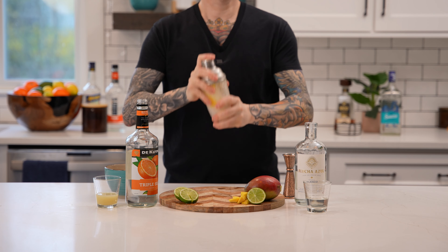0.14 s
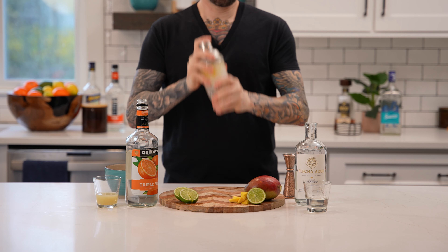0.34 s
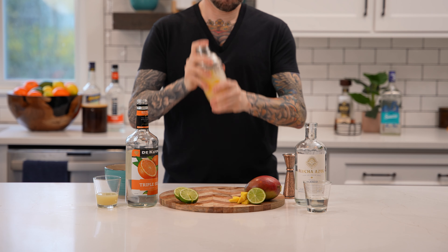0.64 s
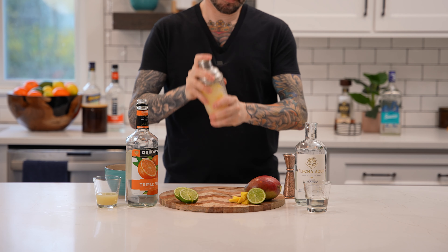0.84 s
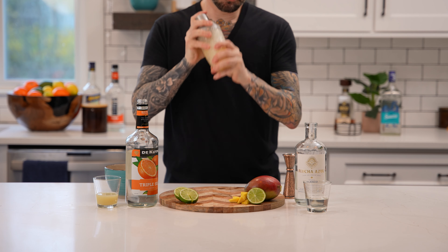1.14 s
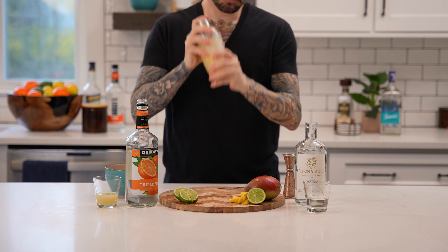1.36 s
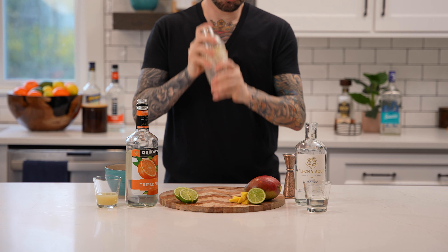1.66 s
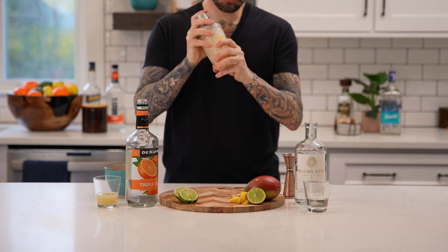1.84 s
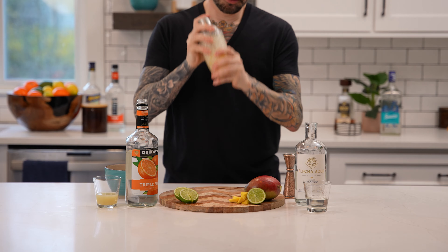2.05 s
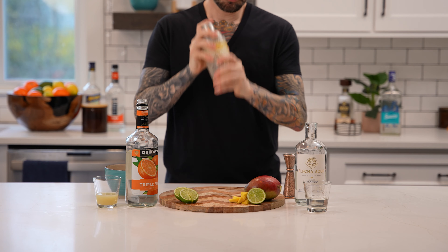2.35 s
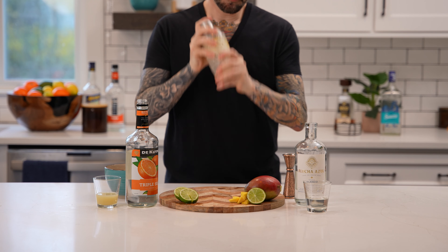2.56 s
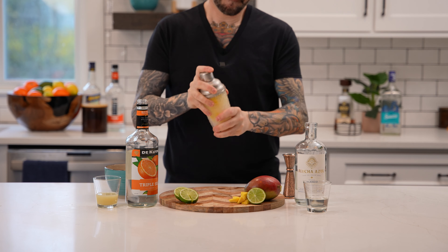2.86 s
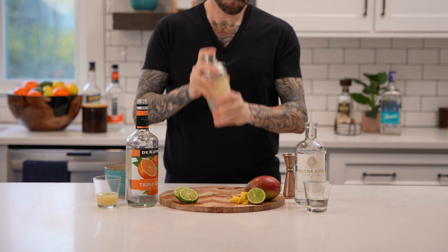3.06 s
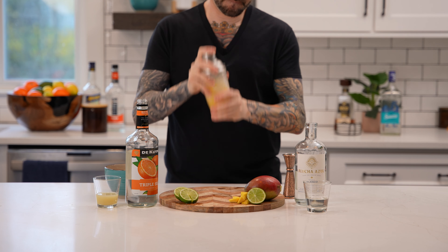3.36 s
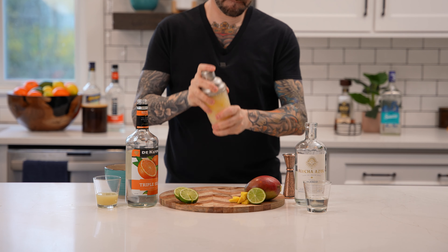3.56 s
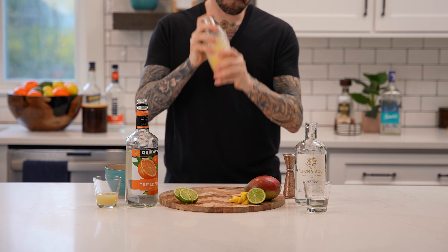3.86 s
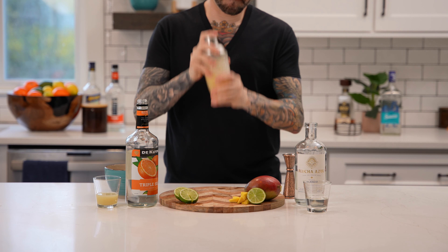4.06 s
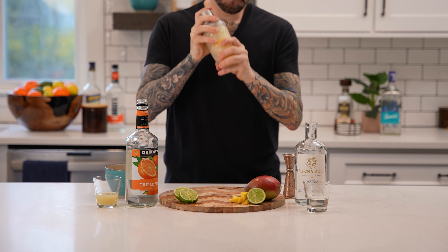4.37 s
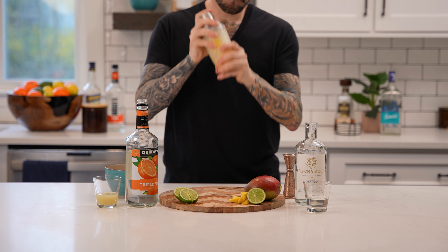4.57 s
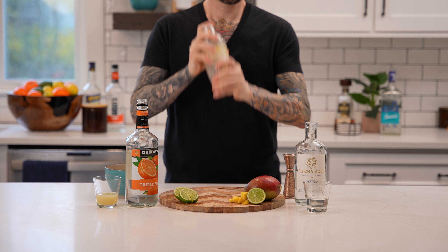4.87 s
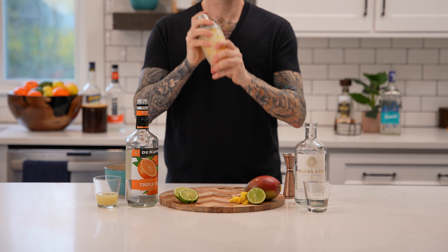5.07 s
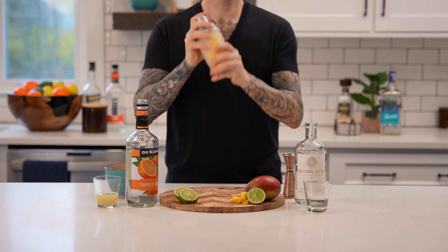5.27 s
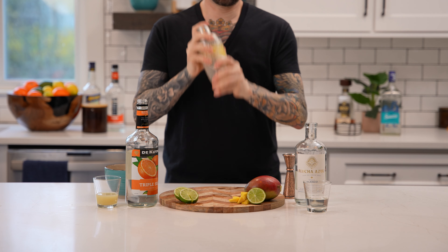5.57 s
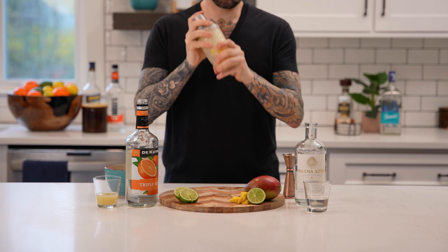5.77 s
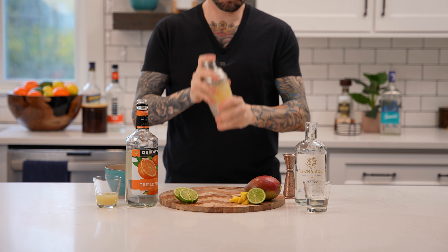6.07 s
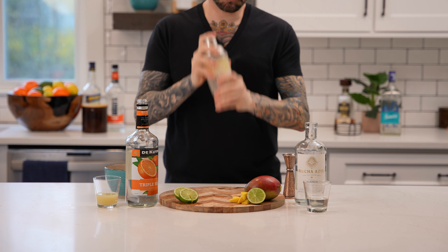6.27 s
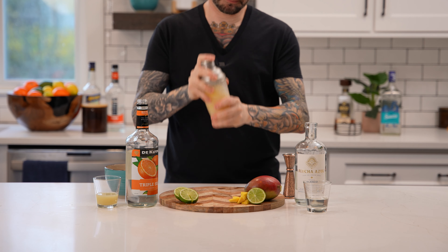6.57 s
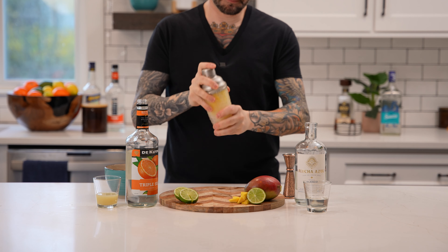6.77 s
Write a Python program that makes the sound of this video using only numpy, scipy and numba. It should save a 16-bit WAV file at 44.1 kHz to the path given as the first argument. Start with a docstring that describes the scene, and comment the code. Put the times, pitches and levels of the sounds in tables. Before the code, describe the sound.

Ice and juice are shaken hard in a hand-held cocktail shaker. Cubes knock sharply and small chips rattle against each end in turn, nearly nine hits a second, with a wet hiss and hollow sloshing underneath. The rhythm runs from start to finish without a pause. The microphone is close, in a kitchen with very little echo and a faint low rumble.

```python
"""Kitchen, one close microphone: ice and juice shaken hard in a hand-held shaker, over a low house rumble.
The load lands at once: ice chips rattle on the damped wall, fine spray hisses along it, the juice
thuds, trapped air glugs and whole cubes knock. It then lands at cap and base in turn, nearly nine
times a second for seven seconds, each landing trailed by a short reflection of the room."""
import sys
import numpy as np
from scipy import signal
from scipy.fft import rfft, irfft
from scipy.io import wavfile
from scipy.ndimage import uniform_filter1d
from numba import njit

SR = 44100
rng = np.random.default_rng(int(sys.argv[2]) if len(sys.argv) > 2 else 0)


def output_pcm(signal):
    """Save a mono or channel-first signal as 16-bit PCM at the path in sys.argv[1].

    Samples are clipped to [-1, 1] before scaling.
    """
    pcm = np.clip(np.atleast_2d(signal).T, -1, 1) * 32767
    wavfile.write(sys.argv[1], SR, np.round(pcm).astype(np.int16))


N = 304856


def undb(db):
    return 10 ** (np.asarray(db) / 20)


def coloured_noise(spectrum):
    """Noise of rms 1 with the given spectrum."""
    hz, db = np.transpose(spectrum)
    bins_hz = np.maximum(np.arange(N // 2 + 1) * SR / N, 1)
    gain = undb(np.interp(np.log(bins_hz), np.log(hz), db, left=-40))
    noise = irfft(rfft(rng.standard_normal(N)) * gain, N)
    return noise / noise.std()


# Room tone, as a relative spectrum: frequency_hz, density_db
RUMBLE_SPECTRUM = [(20, 6), (55, 19), (110, -5), (250, -19), (12000, -60)]

def house_rumble(level_db=-53):
    """The house rumbles low and steady behind the shaker."""
    return coloured_noise(RUMBLE_SPECTRUM) * undb(level_db)


# Landings of the load, base and cap in turn; levels are relative:
# time_s, ice_db, tick_and_spray_db, juice_db, pocket_hz
LANDINGS = [(0.054, -26.5, -37.5, -33, 830), (0.182, -28, -38.5, -34, 625), (0.299, -27, -38.0, -39, 650),
            (0.411, -28.0, -36.5, -34, 630.0), (0.527, -26.5, -34.5, -32.0, 710),
            (0.639, -26.0, -34.5, -39, 497), (0.739, -26.0, -36, -29.5, 720),
            (0.849, -24, -33.5, -33.0, 553), (0.952, -25.5, -34.5, -34.0, 750),
            (1.061, -28.5, -34.5, -33, 530.0), (1.179, -26.5, -37.5, -28, 800),
            (1.295, -25, -30.5, -32.5, 730.0), (1.41, -27, -37, -29, 670),
            (1.522, -23.5, -32.5, -31, 600.0), (1.638, -26.5, -34, -34, 680),
            (1.748, -26, -33.0, -38, 510.0), (1.858, -25.5, -32.5, -35, 600), (1.979, -23, -35.0, -36, 570),
            (2.102, -27.5, -39.5, -33.5, 650.0), (2.218, -28.5, -32.5, -36, 600.0),
            (2.326, -24, -34.5, -29.5, 730.0), (2.442, -27, -33.5, -27, 613), (2.554, -24.5, -35, -29, 890),
            (2.665, -25.0, -35, -31.5, 716), (2.77, -27, -36, -25, 740), (2.885, -23.5, -30, -36, 730),
            (3.001, -25.5, -35, -33, 590), (3.112, -26, -32.0, -29.5, 590.0),
            (3.23, -30, -38.5, -30.5, 726), (3.345, -45, -46, -30.5, 570.0),
            (3.459, -29.5, -41.5, -28, 760), (3.577, -27, -35, -32.5, 757),
            (3.687, -27.5, -35.5, -37, 730.0), (3.8, -28, -32.5, -31.5, 650), (3.912, -27, -37.5, -29, 670),
            (4.02, -23.5, -31.5, -29.0, 614), (4.139, -27, -37.0, -28.5, 714),
            (4.256, -27.5, -36, -30.0, 615), (4.374, -27.5, -35.5, -28, 690.0),
            (4.485, -24, -33, -29.5, 620), (4.601, -27, -40.0, -33, 815), (4.721, -25.5, -33.5, -32, 670.0),
            (4.837, -23.5, -34.5, -27.5, 720), (4.952, -24, -30, -40, 615),
            (5.069, -24.5, -35.5, -31.5, 527), (5.183, -31, -32.5, -31, 610.0),
            (5.297, -28.5, -36.5, -29, 520.0), (5.416, -24.5, -31.5, -32.5, 720.0),
            (5.536, -28, -36, -31.5, 824), (5.649, -23.5, -32.5, -33.0, 740.0),
            (5.768, -27.5, -38.5, -33, 764), (5.89, -26.0, -34, -31.0, 520.0),
            (5.998, -28.5, -41, -34, 680.0), (6.111, -26.5, -30, -28, 630), (6.222, -26, -37.5, -32, 850.0),
            (6.335, -23.5, -31.5, -28.5, 620.0), (6.449, -27.0, -36, -32.5, 674),
            (6.562, -25, -30.5, -31.5, 645), (6.675, -26.5, -41.5, -27, 756), (6.796, -27.0, -35, -31, 630),
            (6.9, -29, -38, -31.0, 690.0)]
TIME, ICE, TICK_AND_SPRAY, JUICE, POCKET = range(5)

def landing_swell_db(t, column, shape, floor_db, steepness, delay_s=0.):
    """The level swells as the load reaches either end and sinks to a floor in between."""
    landings = np.array(LANDINGS)
    since_s = t[:, None] - landings[:, TIME] - delay_s
    build_s, fade_s = (np.resize(pair, len(landings)) for pair in shape)
    width_s = np.where(since_s < 0, build_s, fade_s)
    swells = np.exp(-np.abs(since_s / width_s) ** steepness)
    power = swells @ undb(2 * landings[:, column]) + undb(2 * floor_db)
    return 10 * np.log10(power)


@njit
def ring(start, hz, t60_s, amplitude, contact_s):
    """Every blow starts one decaying sine per mode; the contact time rounds its attack."""
    out = np.zeros(N)
    onset_decay = np.exp(-1 / (contact_s * SR))
    for blow in range(hz.shape[0]):
        for mode in range(hz.shape[1]):
            life = t60_s[blow, mode] * SR
            step = np.exp(2j * np.pi * hz[blow, mode] / SR - np.log(1000) / life)
            phasor, held_back = amplitude[blow, mode] + 0j, 1.
            for i in range(start[blow], min(N, start[blow] + int(life))):
                out[i] += phasor.imag * (1 - held_back) ** 2
                phasor *= step
                held_back *= onset_decay
    return out


# Modes of the shaker held in two hands, before each blow varies them: pitch_hz, level_db, t60_s
SHAKER_MODES = [(89, -6, 0.02), (577.5, -2.5, 0.016), (757.5, 0, 0.0097), (1156, 4.5, 0.0071),
                (1720, -11, 0.0056), (2364, -1, 0.0061), (3214, -3, 0.0032), (4870, -3, 0.0038),
                (6174, -4, 0.0043), (7470, -12, 0.0047), (9420, -12, 0.0046), (11000, -13, 0.004),
                (14000, -36, .002)]

def strike_shaker(start_s, bands_db, detune, scatter_db, damping_spread, contact_s, sustain):
    """Blows at other places and with other grips vary each mode's pitch, strength, sign and damping."""
    hz, mode_db, t60_s = np.transpose(SHAKER_MODES)
    band = np.digitize(hz, (1300, 3600, 8600))  # low, wall, tick and top bands
    draws = rng.standard_normal((len(start_s), 4, len(hz)))
    strength, sign, tuning, damping = draws.swapaxes(0, 1)
    level_db = np.transpose(bands_db)[:, band] + mode_db + scatter_db * strength
    pitch_hz = np.clip(hz * np.exp(detune * tuning), 50, .45 * SR)
    ring_s = sustain * t60_s * np.exp(damping_spread * damping)
    start = np.clip((start_s * SR).astype(np.int64), 0, N - 1)
    return ring(start, pitch_hz, ring_s, undb(level_db) * np.sign(sign), contact_s)


def size_boost_db(luck, spread_db, cap_db):
    """Most pieces hit lightly, a few much harder."""
    return np.minimum(-spread_db * np.log(luck + 1e-9), cap_db)


# Swells of the chips' clatter and of their ticks; rows build, fade: base_s, cap_s
CLATTER_SWELL = ((0.041, 0.049), (.035, 0.03))
TICK_SWELL = ((.035, 0.045), (.055, 0.032))

def ice_chips(count=2800, colour_db=8.0, brightening=0.63):
    """Small pieces of ice clatter on the wall; hard landings are brighter."""
    when, luck, colour = rng.random((count, 3)).T
    start_s = when * N / SR
    size_db = size_boost_db(luck, spread_db=6, cap_db=12)
    clatter_db = landing_swell_db(start_s, ICE, CLATTER_SWELL, floor_db=-43.5, steepness=2.8)
    swell_db = landing_swell_db(start_s, TICK_AND_SPRAY, TICK_SWELL, floor_db=-49.5, steepness=2.3)
    wall_db = clatter_db + size_db + 1.28
    tick_db = swell_db + size_db + 4 + colour_db * (2 * colour - 1)
    top_db = tick_db - 5.5 + brightening * (swell_db - swell_db.mean())
    return strike_shaker(start_s, [wall_db - 16.5, wall_db, tick_db, top_db], detune=0.078,
                         scatter_db=3.44, damping_spread=0.23, contact_s=.00004, sustain=1.22)


# Hiss of the spray, as a relative spectrum: frequency_hz, density_db
SPRAY_SPECTRUM = [(1500, 8.5), (5500, 3.5), (8000, -5), (11000, -12), (14000, -26), (16000, -29)]
# Swell of the spray; rows build, fade: base_s, cap_s
SPRAY_SWELL = ((.02, 0.031), (.04, 0.039))

def spray(flicker_db=6.5, flicker_s=0.0044):
    """Crushed ice and droplets wash along the wall at each landing, a flickering hiss."""
    coarse_t = np.arange(0, N, 64) / SR
    swell_db = landing_swell_db(coarse_t, TICK_AND_SPRAY, SPRAY_SWELL, floor_db=-45.5, steepness=4.6)
    wash_db = np.interp(np.arange(N) / SR, coarse_t, swell_db)
    hold = int(flicker_s * SR)
    steps = np.repeat(rng.standard_normal(N // hold + 1), hold)[:N]
    flicker = uniform_filter1d(steps, hold)
    return coloured_noise(SPRAY_SPECTRUM) * undb(wash_db - 2.5 + flicker_db * flicker)


# Swell of the juice; rows build, fade: base_s, cap_s
JUICE_SWELL = ((0.021, 0.016), (0.013, 0.021))

def juice_swell_db(t, floor_db):
    """The juice lands just behind the ice."""
    return landing_swell_db(t, JUICE, JUICE_SWELL, floor_db, steepness=3, delay_s=0.0043)


def slosh(count=2200):
    """Lumps of juice push the wall softly and for longer than ice, waking mainly the low modes."""
    when, luck = rng.random((count, 2)).T
    start_s = when * N / SR
    thud_db = juice_swell_db(start_s, floor_db=-55) + size_boost_db(luck, spread_db=3.6, cap_db=6.3) - 8
    return strike_shaker(start_s, [thud_db, thud_db - 21, thud_db - 40, thud_db - 50], detune=0.1254,
                         scatter_db=3.93, damping_spread=0.2, contact_s=0.00038, sustain=4.0)


def glugs(count=900, t60_s=0.031, detune=0.086):
    """The air pocket trapped by each slosh rings hollow at its own pitch."""
    when, luck = rng.random((count, 2)).T
    start_s = when * N / SR
    landings = np.array(LANDINGS)
    nearest = np.abs(start_s[:, None] - landings[:, TIME]).argmin(axis=1)
    pitch_hz = landings[nearest, POCKET] * np.exp(detune * rng.standard_normal(count))
    size_db = size_boost_db(luck, spread_db=3.3, cap_db=5.5)
    amplitude = undb(juice_swell_db(start_s, floor_db=-59) + size_db - 0.8)
    return ring((start_s * SR).astype(np.int64), pitch_hz[:, None], np.full((count, 1), t60_s),
                amplitude[:, None], contact_s=0.00042)


# The loudest knocks; levels are relative: start_s, wall_db, tick_db, low_db
LOUD_KNOCKS = [(0.058, -14, -31, -19.5), (0.0677, -15.0, -15.5, -35), (0.1353, -8.5, -19.0, -25),
               (0.1398, -23, -6.5, -21.5), (0.149, -29, -11, -31), (0.1647, -12, -17.0, -13.5),
               (0.1699, -4.5, -8.0, -24), (0.1781, -32, -10.5, -14.5), (0.1863, -8.0, -13, -24.0),
               (0.206, -19, -13, -26), (0.2852, -7.5, -13.5, -29), (0.3663, -5.5, -17.0, -27),
               (0.3965, -2.5, -8.5, -23), (0.5464, -22, -13, -28), (0.5638, -8.0, -6.5, -49),
               (0.5687, -9.5, -7, -38), (0.6191, -11.0, -19.0, -17), (0.6231, -9.5, -11, -15),
               (0.7335, -9, -18, -27), (0.7721, -31, -12.5, -26), (0.7947, -13, -10, -14.5),
               (0.8071, -16, -11, -38), (0.8293, -8, -25, -22), (0.8475, -7, -9.5, -20),
               (0.9366, -17.0, -19, -36), (0.9433, -12, -6.5, -39), (0.959, -23, -14, -22.0),
               (0.981, -21, -16, -26), (1.0118, -18, -10.0, -27.0), (1.0232, -14, -10.5, -27),
               (1.0429, -6.5, -24.0, -25), (1.0509, -12, -17, -17.5), (1.0625, -8, -5, -26.0),
               (1.0664, -14, -15, -39), (1.0724, -9, -8, -24), (1.1703, -10, -10.5, -33),
               (1.2415, -8, -12, -20), (1.2481, -9, -18.0, -38), (1.2962, -15, -19, -21),
               (1.301, -12, -16, -15), (1.3143, -19, -10.0, -21.0), (1.3185, -17, -10, -33),
               (1.3348, -12.5, -14.0, -35), (1.4486, -6.5, -11, -10.5), (1.5005, -6.0, -11, -21),
               (1.5328, -19, -10.5, -30), (1.546, -9, -22, -27), (1.6302, -15, -17, -20.5),
               (1.67, -9, -11, -25), (1.7011, -6.5, -9, -22), (1.7238, -11.0, -11, -25),
               (1.7323, -8, -20.0, -18), (1.7573, -10, -9, -26), (1.888, -24, -9, -23),
               (1.9178, -12.5, -6.5, -18), (1.9536, -8, -13.5, -16), (1.996, -18, -20, -35.0),
               (2.092, -13, -17, -29), (2.1219, -18, -11, -37), (2.1297, -6, -15, -44),
               (2.1993, -12.0, -5.5, -25), (2.2195, -12, -12, -29), (2.2294, -13, -10, -19),
               (2.234, -12, -8, -19.0), (2.3346, -33, -17, -19), (2.3873, -22.0, -11.5, -44),
               (2.3995, -10.0, -11, -40.0), (2.4418, -12, -14, -23.0), (2.4598, -20.0, -7.5, -27),
               (2.4682, -20.0, -14, -24), (2.5337, -17, -18.5, -42), (2.6169, -10, -12, -37),
               (2.6273, -14.5, -13, -22.5), (2.6394, -8, -9.5, -36), (2.6478, -8.0, -14, -29),
               (2.6769, -18.0, -9, -34), (2.873, -10, -18, -36), (2.881, -16.0, -8.5, -22),
               (2.888, -15, -19, -35), (2.8971, -14, -9, -37), (2.907, -21.0, -18, -32),
               (2.9311, -18, -19, -30), (2.976, -16.5, -19, -31), (3.0897, -6, -9.0, -19),
               (3.1028, -4, -6, -22.0), (3.1242, -17, -12.0, -26), (3.1312, -6, -12.5, -26.0),
               (3.209, -7, -24, -19), (3.2218, -13.5, -25, -34), (3.3001, -9, -15.5, -32),
               (3.3268, -4.5, -9, -21.0), (3.34, -5.5, -10, -14.5), (3.3468, -8, -17, -29),
               (3.361, -3, -7.0, -27), (3.5179, -9.0, -7, -38), (3.5457, -9, -23, -41),
               (3.5646, -21, -15, -38), (3.5792, -10, -11, -23.5), (3.7677, -10, -31, -37),
               (3.7821, -12, -17, -40), (3.7899, -28.0, -13, -23), (3.823, -10, -8, -25),
               (3.8303, -24, -28, -21.5), (3.9771, -3.5, -9, -24), (4.0243, -10, -9, -30),
               (4.0354, -13, -20, -15), (4.069, -11.5, -16.5, -30.0), (4.1523, -8.5, -11, -12.5),
               (4.1901, -9, -10.0, -31), (4.2494, -10.5, -9, -37), (4.27, -10.5, -9.5, -32),
               (4.306, -17, -20, -45), (4.3681, -12.5, -20.0, -31), (4.486, -13, -23, -36),
               (4.5022, -12, -20.0, -36), (4.5903, -11, -13.5, -33), (4.7078, -6.0, -21, -30.0),
               (4.7138, -19, -13, -18), (4.732, -23, -13, -28), (4.8477, -28, -11.0, -34),
               (4.9233, -18, -11, -33), (4.9501, -17, -14, -33.0), (4.9693, -23, -9.0, -22.0),
               (5.025, -20, -17, -42.0), (5.1239, -2.5, -19, -24), (5.1617, -10, -15, -18),
               (5.1851, -6, -10, -16), (5.3082, -14, -8.5, -28.0), (5.4126, -26, -9, -21),
               (5.4339, -9, -23, -25), (5.4529, -12, -11.5, -44), (5.6483, -9, -11.5, -25),
               (5.7673, -9.5, -24, -18.0), (5.7934, -20, -7.5, -26), (5.822, -8.5, -15, -41),
               (5.833, -11, -10, -46), (6.1067, -5, -12.0, -22), (6.1142, -24, -14, -24.0),
               (6.1877, -15, -7.5, -42), (6.268, -14, -9.5, -33), (6.3178, -8, -12, -19),
               (6.353, -10.5, -20, -28), (6.5094, -10.0, -12, -39), (6.5378, -7, -11, -38),
               (6.555, -4.5, -16, -41), (6.584, -12, -11, -24), (6.6481, -12.0, -14, -27),
               (6.7788, -14, -16, -46), (6.7952, -11, -23, -34), (6.7985, -14, -8, -22)]
# Gain of each band at a knock: low_db, wall_db, tick_db, top_db
KNOCK_BAND_GAINS = (1, 5.5, 5, 0.5)

def cube_knocks():
    """Whole cubes knock on the wall; the low thud heard with a knock is often the juice sloshing."""
    start_s, wall_db, tick_db, low_db = np.transpose(LOUD_KNOCKS)
    bands_db = np.array([low_db, wall_db, tick_db, tick_db]) + np.array(KNOCK_BAND_GAINS)[:, None]
    return strike_shaker(start_s, bands_db, detune=0.057,
                         scatter_db=1.66, damping_spread=0.3, contact_s=.00005, sustain=0.83)


def radiate(vibration, cutoff_hz=375, leak_db=-12.5):
    """A small vessel radiates little bass; a share still passes, in opposite phase."""
    highpass = signal.butter(2, cutoff_hz, "high", fs=SR, output="sos")
    return signal.sosfilt(highpass, vibration) - undb(leak_db) * vibration


def kitchen(direct, t60_s=0.12, level_db=-18, dull_hz=9200):
    """Tiles and counter add a dull, diffuse tail, well below the close sound."""
    t = np.arange(SR // 2) / SR
    tail = rng.standard_normal(len(t)) * undb(-60 * t / t60_s) * (t > .003)
    tail = signal.lfilter(*signal.butter(1, dull_hz, fs=SR), tail)
    tail /= np.sqrt(np.sum(tail ** 2))
    return direct + undb(level_db) * signal.fftconvolve(direct, tail)[:N]


def scene():
    """The shaker close up, the kitchen around it and the house behind, in mono."""
    shaker = radiate(cube_knocks() + ice_chips() + slosh() + glugs() + spray())
    return (kitchen(shaker) + house_rumble())[None]


def record(dry, low_cut_hz=220, ceiling=.99, top_hz=16000):
    """The microphone thins the bass, the loudest knocks are rounded and the top is cut."""
    thin = signal.sosfilt(signal.butter(1, low_cut_hz, "high", fs=SR, output="sos"), dry)
    rounded = ceiling * thin / (ceiling ** 6 + thin ** 6) ** (1 / 6)
    return signal.sosfilt(signal.ellip(8, .2, 70, top_hz, fs=SR, output="sos"), rounded)


dry = scene()
out = record(dry)
output_pcm(out)
```